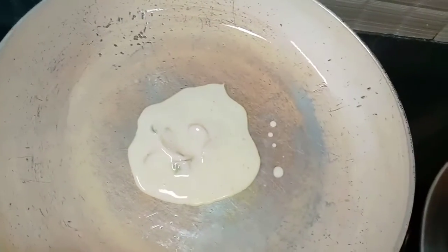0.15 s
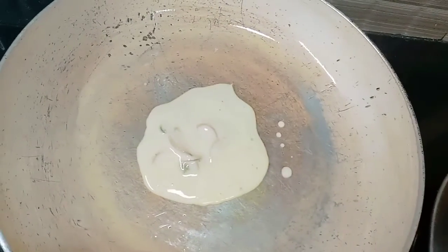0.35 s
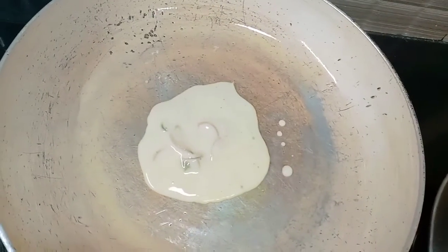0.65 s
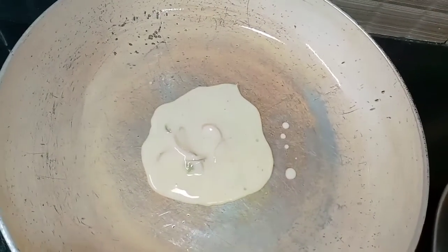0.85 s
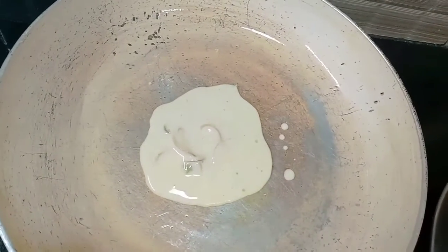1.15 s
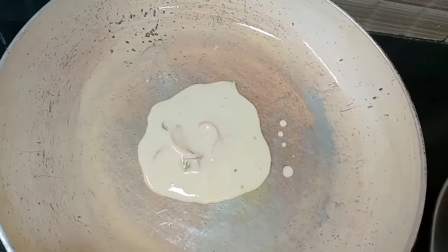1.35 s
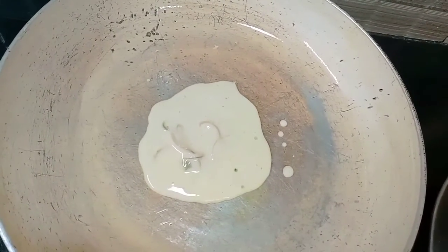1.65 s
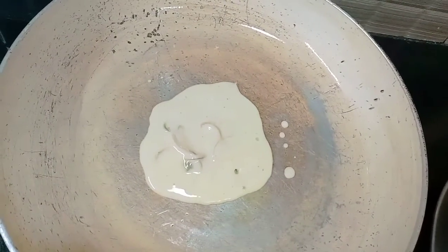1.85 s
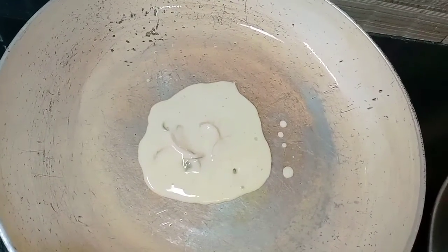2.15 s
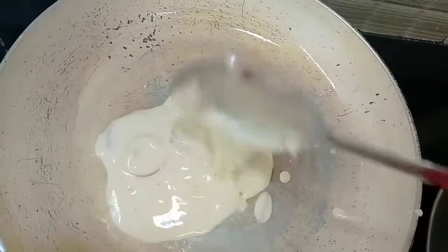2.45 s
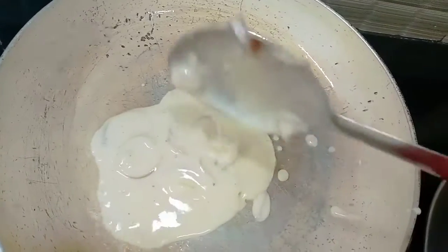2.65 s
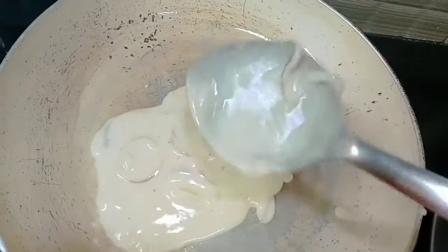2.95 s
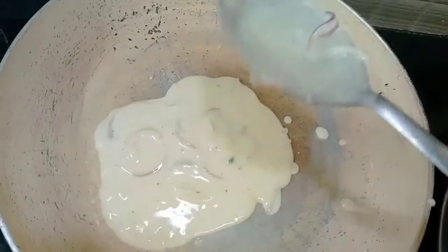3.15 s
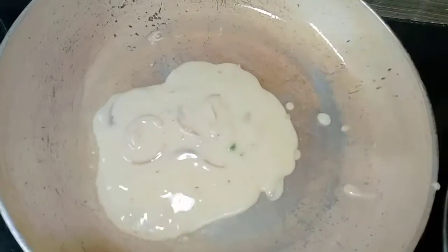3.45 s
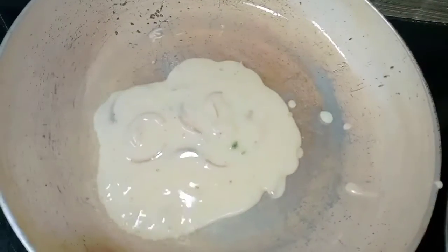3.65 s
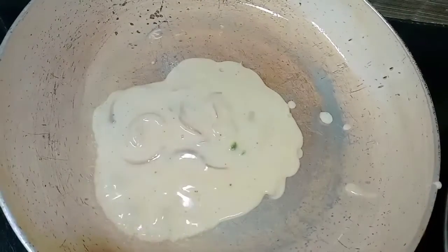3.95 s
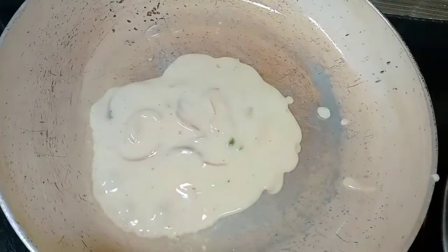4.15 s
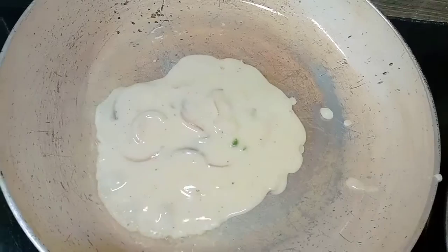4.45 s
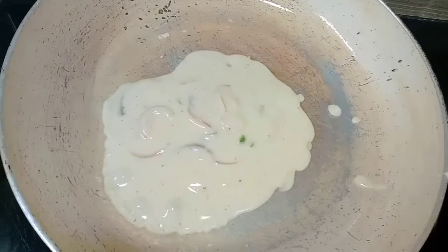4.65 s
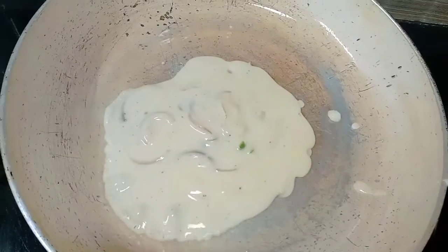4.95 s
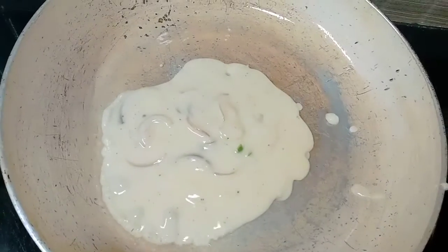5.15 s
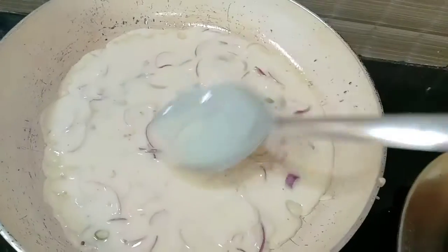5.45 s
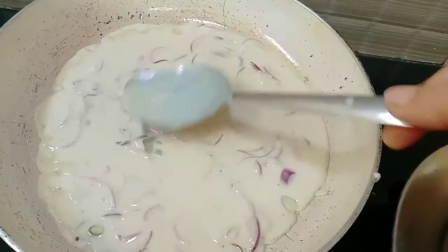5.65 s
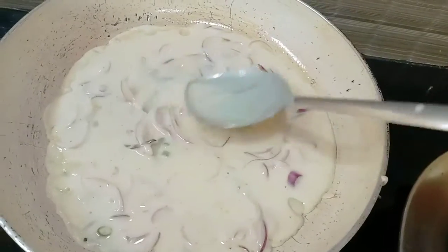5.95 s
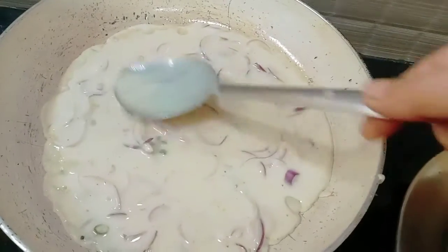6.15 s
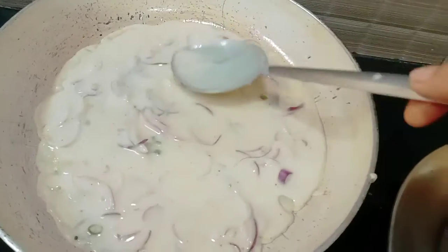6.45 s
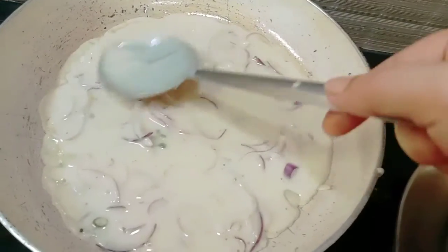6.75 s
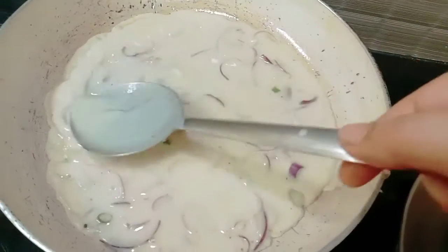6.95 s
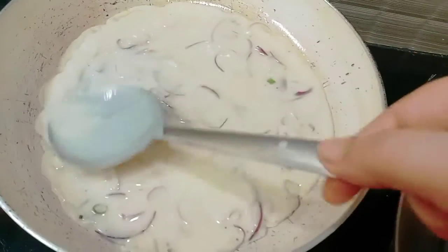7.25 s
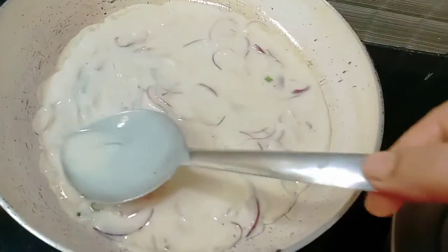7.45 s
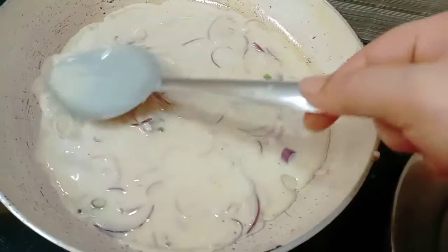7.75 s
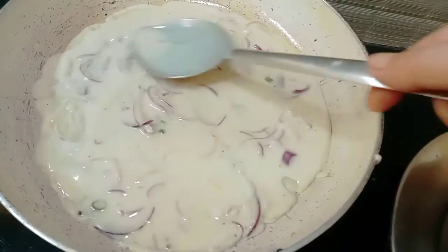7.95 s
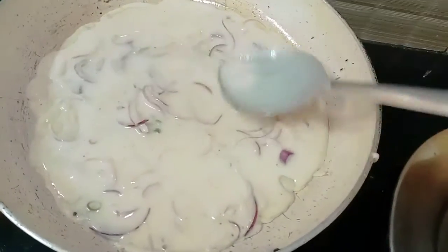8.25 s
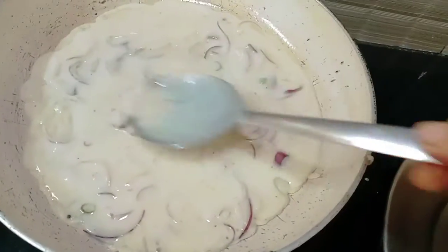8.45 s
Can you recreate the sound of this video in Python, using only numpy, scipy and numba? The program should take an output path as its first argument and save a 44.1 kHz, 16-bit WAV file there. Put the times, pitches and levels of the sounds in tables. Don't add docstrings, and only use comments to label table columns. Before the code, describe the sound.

Phone-close mono sound of frying: a bright, thinning sizzle with sharp bubble pops and a quick metal rattle, then a sudden strong wet frying rush. It eases for about three seconds and drops out for an instant. Afterwards, sparse gentle bubbling and faint spitting rise in small bursts as batter is spread, with low kitchen hum behind.

```python
import sys
import numpy as np
from scipy import signal
from scipy.fft import rfft, irfft, next_fast_len
from scipy.io import wavfile
from scipy.ndimage import uniform_filter1d, map_coordinates
from numba import njit

SR = 44100
rng = np.random.default_rng(int(sys.argv[2]) if len(sys.argv) > 2 else 0)


def gain_from_db(level_db):
    decades = np.asarray(level_db, float) / 20
    return 10 ** decades


def store_wav(level_fs):
    pcm = np.round(np.clip(np.atleast_2d(level_fs), -1, 1) * 32767)
    wavfile.write(sys.argv[1], SR, pcm.T.astype(np.int16))


N = 379701
SIZE = next_fast_len(N)
T = np.arange(N) / SR
HZ = np.arange(SIZE // 2 + 1) * SR / SIZE

# frequency in Hz, level per Hz in dB.
AIR = [(25, 19.5), (70, 4.5), (140, 17), (500, -4), (950, -36), (1900, -11), (5000, -27), (15500, -46)]
AIR_DB, FULL_PAN_AIR_DB = -65, -1
# frequency in Hz, width in Hz, level in dB.
HUM = [
    (100.5, 15, -63),
    (201, 11.5, -71.5),
    (260, 14, -85),
    (300, 15.5, -68.5),
    (420, 18, -73.5),
    (737, 12, -76.5),
    (790.4, 13, -73.5),
    (1277, 41, -78),
]
# time in seconds, peak in dB.
BOUNCES = [(0.724, -36.5), (1.036, -18), (1.047, -31), (1.06, -26), (1.086, -35), (1.098, -21), (1.11, -34),
           (1.127, -26), (1.149, -28), (1.179, -32), (1.195, -39), (1.207, -38), (1.219, -40), (1.231, -41),
           (4.464, -38), (4.485, -40), (4.52, -33.5), (4.564, -43)]
# frequency in Hz, level in dB, time to fall by 120 dB in seconds.
SPOON_MODES = [(484, -16, 0.057), (652, -13, 0.06), (820, -17, 0.044), (885, -5, 0.036), (935, -0.5, 0.035),
               (1260, -7, 0.055), (1630, -10, 0.05), (1870, -18, 0.034), (2140, -20, .035),
               (2220, -4, 0.035), (2560, -11, 0.045), (3100, -12, 0.07), (3400, -14, 0.08),
               (1500, -9, 0.0097)]
# start
# in seconds, length in seconds, level in dB, pitch in Hz.
SWELLS = [(.064, .04, -59, 420), (.204, 0.053, -58, 420), (.293, .035, -61, 420), (.385, 0.088, -56.5, 420),
          (.575, 0.12, -56, 420), (.77, 0.042, -54, 190), (.828, 0.046, -58.5, 420),
          (0.945, 0.054, -61, 420), (1.585, 0.047, -61.5, 420), (1.983, 0.12, -57.5, 420),
          (2.596, .086, -52, 420), (3.047, .066, -56.5, 420), (3.301, 0.16, -52.5, 420),
          (3.9, .08, -61, 420), (4.12, 0.056, -57, 420), (4.331, 0.057, -60, 420), (4.96, .06, -59, 420),
          (5.22, 0.12, -57.5, 420), (5.438, .096, -57, 420), (6.131, 0.033, -60, 420),
          (6.767, .084, -53.5, 420), (6.902, .062, -58, 420), (7.267, .04, -57, 420),
          (8.353, 0.031, -56.5, 420), (8.549, 0.055, -59, 420), (.9, 0.11, -55.5, 1260),
          (1.549, .068, -57, 1260), (1.926, .072, -58, 1260), (2.172, .05, -59, 1260),
          (6.611, 0.086, -57.5, 1260), (6.767, .038, -60, 1260), (6.945, 0.04, -57, 1250),
          (6.994, .04, -61, 1260), (7.082, .06, -58, 1260), (7.269, .046, -58, 1260),
          (7.918, 0.06, -59, 1260), (8.125, 0.06, -59, 1290), (8.4, .035, -58, 1150),
          (8.51, .065, -61, 810), (8.259, .052, -59, 1260), (5.749, .08, -63, 785), (6.34, .06, -63, 785),
          (6.93, .17, -60.5, 785), (7.5, .2, -66, 785), (8.1, .14, -63.5, 785), (5.55, 1.6, -67, 299.6),
          (7.2, 1.5, -66, 300)]
# start in
# seconds, end in seconds, pitch in Hz, width in Hz, level in dB.
VENTS = [(.5, 2.6, 5350, 300, -68), (2.25, 2.76, 1284, 200, -38), (5.5, 6.2, 1770, 730, -59.5),
         (5.63, 5.85, 3600, 350, -64), (5.8, 6.25, 3500, 300, -63), (5.6, 5.9, 1500, 400, -60),
         (4.54, 4.64, 2600, 1600, -45), (7.9, 8.4, 3800, 2200, -49), (7.8, 8.45, 2200, 800, -53),
         (7.165, 7.21, 8600, 3000, -60), (7.24, 7.32, 9000, 2000, -58), (6.71, 6.78, 9000, 4000, -56),
         (6.87, 6.94, 8000, 2200, -55), (8.12, 8.2, 9500, 3000, -54), (4.45, 4.51, 1500, 900, -52),
         (5.1, 5.4, 1450, 250, -50.5), (6.85, 7.3, 3700, 350, -58.5), (6.75, 7.04, 2870, 270, -59.5),
         (5.63, 5.8, 5130, 900, -63), (6.52, 6.8, 2930, 460, -52.5), (6.505, 6.84, 3900, 800, -51.5),
         (6.52, 6.8, 10000, 1000, -57), (6.55, 7, 7320, 800, -58), (6.6, 7.8, 1840, 250, -65),
         (6.7, 4.8, 8970, 1300, -70), (7.05, 7.4, 5030, 2170, -60), (7.24, 6.6, 1400, 900, -58),
         (7.5, 8.2, 4400, 2400, -61), (7.78, 8.3, 4400, 2000, -51), (7.82, 8.3, 7200, 1000, -51.5),
         (7.98, 8.5, 2900, 1800, -51), (8.1, 8.7, 9100, 1100, -51.5), (6.85, 7.45, 4300, 2600, -55),
         (5.38, 12, 200, 150, -64.5), (5.38, 16, 300, 20, -69), (2.24, 3.6, 14900, 900, -43),
         (2.24, 3.4, 12000, 1800, -42), (5.85, 6.45, 2500, 1200, -65.5), (7.9, 8.1, 10300, 1500, -52),
         (8.2, 10.4, 4013, 1400, -55.5)]
# middle in seconds, length in ms, level
# in dB, # pitch in Hz.
SPITS = [(.281, 10, -41, 7000), (.559, 8, -42, 7500), (.655, 8, -44, 7000), (.735, 16, -42, 4000),
         (1.051, 20, -47, 2900), (1.105, 16, -51, 3100), (1.217, 9, -42, 8000), (1.24, 8, -45, 7000),
         (1.345, 14, -46, 5500), (1.366, 20, -44, 7300), (1.417, 12, -51, 4000), (1.492, 20, -46, 7300),
         (1.633, 24, -50, 5000), (1.655, 14, -47, 8500), (1.721, 24, -48, 7000), (1.87, 22, -44, 6500),
         (1.884, 22, -45, 11000), (2.083, 10, -50, 7000), (2.157, 12, -47, 5500), (3.382, 16, -34, 3800),
         (3.47, 12, -33, 5500), (3.529, 18, -33, 4000), (3.545, 20, -35, 7000), (3.741, 24, -33, 4000),
         (3.83, 12, -37, 3500), (3.929, 24, -35, 3500), (4.003, 26, -34, 3500), (4.208, 26, -40, 4000),
         (4.701, 20, -44, 4000), (5.081, 12, -40, 11000), (5.155, 20, -38, 7000), (5.28, 10, -39, 8000),
         (5.308, 9, -42, 7000), (5.397, 6, -75, 13000), (5.563, 3, -64, 13000), (5.586, 12, -62, 7700),
         (5.86, 24, -65, 6500), (5.941, 12, -66, 6500), (6.068, 16, -59, 7000), (6.086, 10, -66, 11000),
         (6.244, 8, -72, 7000), (6.842, 14, -56, 7500), (6.893, 10, -51, 8000), (7.067, 26, -54, 6500),
         (7.17, 16, -53, 10000), (7.515, 14, -56, 6500), (7.7, 14, -55, 6000), (7.935, 20, -43, 10500),
         (8.141, 24, -45, 10000), (8.377, 10, -47, 7000), (4.52, 30, -49, 1000), (7.347, 14, -55, 1700),
         (5.513, 16, -56, 1500), (2.6, 14, -36, 2000), (2.44, 24, -36, 1000)]
# time in seconds, peak in dB, pitch in Hz.
POPS = [(0.1177, -22, 7670), (0.555, -29, 7570), (0.729, -17, 7400), (0.7651, -20, 7580),
        (0.9002, -23, 7300), (1.2149, -27, 6950), (1.5814, -15.5, 8160), (3.417, -28, 6640),
        (3.521, -24, 3970), (3.9982, -24, 3720), (4.2897, -30, 5740), (4.572, -24, 2300),
        (5.1467, -18, 7170), (5.254, -22, 4610), (5.507, -36, 1300), (5.6369, -42, 1500),
        (5.6438, -43, 3660), (5.7346, -40, 3710), (5.9376, -47, 3500), (5.9635, -45, 3600),
        (5.9815, -45, 3660), (5.766, -35, 2100), (5.766, -34, 3600), (5.8534, -41, 1890),
        (6.019, -31, 3460), (6.0632, -42, 1860), (6.396, -29.5, 2500), (6.7396, -32, 2800),
        (6.8904, -36, 2830), (6.9037, -35, 4000), (6.954, -37, 1253), (7.0216, -33, 3010),
        (7.069, -40, 1200), (7.165, -33, 3200), (7.1655, -31, 8390), (7.2521, -40, 7500),
        (7.343, -34, 1300), (7.511, -46, 1950), (7.6961, -39, 9350), (7.7605, -38, 4500),
        (7.8034, -32, 4270), (7.8445, -27, 7100), (7.8665, -20, 4300), (7.902, -26.5, 3700),
        (7.9201, -26, 7040), (8.047, -33, 3830), (8.1351, -29, 8990), (8.157, -27, 6990),
        (8.2709, -28, 6970), (8.4871, -32, 6600), (8.557, -32, 3500)]
POP_DB = 1.5
# pitch in Hz, octaves spanned.
SIZES = [
    (450, 2.3),
    (1600, 1.3),
    (3900, 1.3),
    (9000, 1.1),
]
# start in seconds, length in seconds, fizz in dB, cooling in dB per second, wetness.
SURGES = [(-.05, 2.287, -37, 4, 0.35), (-.05, 0.51, -37.5, 11.5, 0.73), (0.694, 0.053, -41.5, 26, 1.2),
          (2.241, 3.146, -31.5, 1.94, 1.02), (2.658, 1.58, -39, 0, 1.41), (2.265, 0.39, -55, 13, 3.2),
          (3.815, 0.23, -54, 3, 1.3), (4.453, 0.06, -49.5, 28.5, 1.96), (4.558, 0.051, -41, 25, 1.3),
          (5.35, 0.777, -73.5, -4, 2.7), (6.106, 0.46, -73.5, -3, 2.06), (6.32, 0.105, -62.5, 11, 2.53),
          (6.5, 0.91, -54.5, 8, 1.63), (7.403, 0.13, -65.5, -1, 1.9), (6.53, 0.09, -50, 14, 0.23),
          (7.235, 0.16, -61, 28, 2.4), (7.49, 0.28, -61, -10, 1.52), (7.735, 0.147, -54, -57, 0.89),
          (7.888, .9, -45, 2.5, 0.66), (7.903, 0.03, -40, 20, .8)]
RISE_S, FALL_S, DRYING_PER_S = 0.018, 0.013, 0.32
DRY_DB = [-36, -16, -6, 0.5]
WET_DB = [16, 9, 6, -0.5]
# time in seconds, level in dB.
SIMMER_DB = [
    (0, -62),
    (2.3, -61),
    (5.3, -68),
    (5.4, -56),
    (6.3, -62),
    (6.8, -60),
]
SPOTS = 6
CROWDED_FLARE, SPARSE_FLARE = .55, .9
# frequency in Hz, width in Hz, lift in dB.
PAN = [(419, 30, 4), (550, 230, -4.5), (950, 160, -0.5), (1258, 75, 10), (1500, 150, 5.5), (2100, 160, 4.5),
       (2930, 98, -3.5), (1930, 180, -3.5), (2390, 89, -6), (4770, 140, -3.5), (5580, 170, 1.5)]
# start in seconds, end in seconds, frequency in Hz,
# width in Hz, share removed 0-1.
SHADES = [(0, 1.0, 640, 300, 0.65), (1.25, 2.24, 800, 500, 0.5), (.45, 2, 6300, 400, 0.5),
          (3.0, 5.34, 557, 200, .25), (5.4, 6, 950, 300, .5), (6.5, 7, 2230, 500, 0.7),
          (6.7, 7.3, 4450, 400, 0.3), (6.95, 7.3, 3300, 200, 0.5), (7.45, 8.4, 1604, 400, 0.55),
          (7.4, 7.6, 6350, 400, .5), (8.31, 8.39, 1100, 900, .6), (8.5, 8.61, 1400, 900, .5),
          (8.15, 8.35, 550, 200, .5), (6.1, 6.33, 4500, 2500, .1), (4.63, 4.9, 2600, 900, .4),
          (6.78, 7.14, 10500, 3000, .3), (7.19, 7.24, 9000, 4000, .4), (5.75, 6.05, 1270, 120, .5),
          (2.2, 2.45, 4300, 1200, .3), (2.2, 2.45, 3000, 900, .25), (2.2, 2.45, 8700, 2500, .2),
          (2.9, 3.2, 2300, 600, .25), (3.35, 3.7, 8700, 2500, .2), (3.15, 3.45, 1000, 300, .3),
          (6.28, 6.45, 480, 150, .6), (4.45, 4.7, 470, 150, .6)]
# time in seconds, lag in ms, share.
HAND = [
    (4.6, .85, 0),
    (4.85, .55, .4),
    (5.0, .345, .62),
    (5.14, .24, .72),
    (5.34, .205, .75),
    (5.36, .205, 0),
]
# frequency in Hz, width in Hz, lift in dB.
PHONE = [(4400, 110, -3.5), (6294, 310, -6.5), (7200, 2180, 3), (8100, 230, -8.5), (12480, 1750, -5.5),
         (13800, 900, -5.5), (14500, 1200, 2.5), (15400, 650, 7)]
PHONE_LOW_HZ, PHONE_TOP_HZ = 80, 15470
# time in seconds, level in dB.
GAP = [
    (5.336, 0),
    (5.3366, -20),
    (5.35, -90),
    (5.366, -90),
    (5.371, -6),
    (5.378, 0),
]
LADLE_S, GAP_S = SURGES[3][0], GAP[0][0]


def unit(x):
    return x / np.sqrt(np.mean(x ** 2))


def walk(rate):
    hold = max(int(SR / rate), 2)
    steps = np.repeat(rng.standard_normal(N // hold + 1), hold)
    return 1.2 * uniform_filter1d(steps, hold)[:N]


def hiss(hz, width):
    resonance = 1 / (1 + (1.3 * (HZ - hz) / width) ** 2) ** 2
    return unit(irfft(rfft(rng.standard_normal(SIZE)) * resonance, SIZE)[:N])


def colour(x, modes):
    db = sum(lift / (1 + (2 * (HZ - hz) / width) ** 2) for hz, width, lift in modes)
    cepstrum = irfft(db * np.log(10) / 20, SIZE)
    cepstrum[1:SIZE // 2] *= 2
    cepstrum[SIZE // 2:] = 0
    return irfft(rfft(x, SIZE) * np.exp(rfft(cepstrum)), SIZE)[..., :N]


@njit
def ring(start, hz, tau, size):
    out = np.zeros(N + 1)
    for k in range(len(start)):
        turn = np.exp(2j * np.pi * hz[k] / SR - 1 / tau[k])
        rise_decay = np.exp(-4 / tau[k])
        net = 1 / (1 - turn) - 1 / (1 - turn * rise_decay)
        z = size[k] * np.conj(net) / abs(net)
        rise = 1.
        for i in range(start[k], min(N, start[k] + int(6 * tau[k]) + 2)):
            out[i] += z.imag * (1 - rise)
            z, rise = z * turn, rise * rise_decay
    return out[:N]


def room(x, t60=0.26, wet_db=-6, rim_db=-5):
    t = T[:SR // 2]
    tail = rng.standard_normal(len(t)) * np.exp(-np.log(1000) * t / t60) * np.minimum(t / 0.0072, 1)
    path = gain_from_db(wet_db) * tail / np.linalg.norm(tail)
    path[0] = 1
    path[rng.integers(6, 110, size=6)] = gain_from_db(rim_db) * np.array([1, -1, .8, -.8, .6, -.6])
    path = path / np.linalg.norm(path)
    cut = int(GAP[2][0] * SR)
    return np.concatenate([signal.oaconvolve(part, path)[:len(part)] for part in (x[:cut], x[cut:])])


def kitchen():
    hz, db = np.transpose(AIR)
    slope = gain_from_db(np.interp(np.log(HZ + 1), np.log(hz), db))
    air = irfft(rfft(rng.standard_normal(SIZE)) * slope, SIZE)[:N]
    hum = sum(gain_from_db(db) * hiss(hz, width) for hz, width, db in HUM)
    air_db = AIR_DB + FULL_PAN_AIR_DB * (T > GAP_S) + 1.3 * walk(2.25)
    return unit(air) * gain_from_db(air_db) + hum


def spoon():
    s, db = np.repeat(np.transpose(BOUNCES), len(SPOON_MODES), axis=1)
    hz, mode_db, t60 = np.tile(np.transpose(SPOON_MODES), len(BOUNCES))
    detune, uneven = rng.standard_normal((len(s), 2)).T
    tau = t60 * SR / np.log(1000) / 2
    size = gain_from_db(db + mode_db + 1.3 * uneven - 1.0)
    return ring((s * SR).astype(np.int64), hz * (1 + 0.008 * detune), tau, size)


def swells(edge_s=.018, waver=0.012):
    out, drift = np.zeros(N), 1 + waver * walk(25)
    for (s, length, db, hz), turn in zip(SWELLS, rng.random(len(SWELLS))):
        on = (T > s - edge_s) & (T < s + length + edge_s)
        inside = np.minimum(T[on] - s, s + length - T[on])
        shape = np.sin(np.pi / 2 * np.clip(inside / (2 * edge_s) + .5, 0, 1)) ** 2
        out[on] += gain_from_db(db + 3) * shape * np.sin(2 * np.pi * (np.cumsum(hz * drift[on]) / SR + turn))
    return out


def vents(edge_s=0.033):
    out = np.zeros(N)
    for a, b, hz, width, db in VENTS:
        splutter = gain_from_db(db + 1.1 * walk(22) + 2.4 * walk(170) - .8)
        opening = np.interp(T, [a, a + edge_s, b], [0, 1, 0]) ** .5
        out += splutter * opening * hiss(hz, width)
    return out


def spits(spread=.28, grain_db=5):
    out, half = np.zeros(N), 2048
    t = np.arange(-half, half) / SR
    draws = rng.standard_normal((len(SPITS), 2, 2 * half))
    for (s, ms, db, hz), (noise, grain) in zip(SPITS, draws):
        edges = [hz * (1 - spread), min(hz * (1 + spread), 16000)]
        band = signal.butter(2, edges, "band", fs=SR, output="sos")
        crackle = unit(signal.sosfilt(band, noise * gain_from_db(grain_db * grain)))
        middle = int(s * SR)
        out[middle - half:middle + half] += gain_from_db(db) * crackle * np.exp(-(2000 * t / ms) ** 2)
    return out


def pops(burst_ms=.04, turns=1.1):
    out = 0
    for (s, db, centre), (late, off) in zip(POPS, rng.standard_normal((len(POPS), 2, 12))):
        hz = np.minimum(centre * 2 ** (np.linspace(-.2, 1.6, 12) + .1 * off), 15000)
        start = ((s + burst_ms / 1000 * late ** 2) * SR).astype(np.int64)
        size = np.minimum(hz / centre, (centre / hz) ** 0.76)
        pop = ring(start, hz, turns * SR / hz, size)
        out = out + gain_from_db(db + POP_DB) * pop / np.abs(pop).max()
    return out


def boil():
    power = np.full((4, N), 1e-12)
    power[0] += gain_from_db(np.interp(T, *np.transpose(SIMMER_DB))) ** 2
    dropped_s = GAP[1][0]
    for start, length, db, cooling, wet in SURGES:
        on = (T > start) & (T < start + length + FALL_S) & ((T < dropped_s) | (start > dropped_s))
        age = T[on] - start
        gate = np.clip(np.minimum(age / RISE_S, 1 + (length - age) / FALL_S), 0, 1)
        wetness = np.maximum(wet - DRYING_PER_S * age, 0)
        size_db = db - cooling * age + np.c_[DRY_DB] + np.c_[WET_DB] * wetness
        power[:, on] += (gate * gain_from_db(size_db)) ** 2
    return 10 * np.log10(power)


def bubbles(per_s=30000, turns=1.1, scatter_db=2.85, low_hz=150, top_hz=16500):
    when, pick, life, odd, where = rng.random((int(per_s * N / SR), 5)).T
    start, spot = (when * N).astype(np.int64), (where * SPOTS).astype(int)
    span = np.sqrt(top_hz) - np.sqrt(low_hz)
    hz = (np.sqrt(low_hz) + pick * span) ** 2
    tau = np.maximum(turns * (.4 + 1.2 * life) * SR / hz, 1.5)
    per_octave = per_s * np.sqrt(hz) / (2 * span) * np.log(2)

    centre, octaves = np.transpose(SIZES)
    calm = np.where((T > LADLE_S) & (T < GAP_S), CROWDED_FLARE, SPARSE_FLARE)
    flare = 0.23 * walk(12) + 0.46 * walk(60) + 2.0 * walk(400)
    class_db = [(c + calm * (flare + 0.5 * walk(20) + 0.2 * walk(220)))[start] for c in boil()]
    class_db = class_db - 10 * np.log10(octaves)[:, None]
    place = np.interp(np.log(hz), np.log(centre), np.arange(4))
    db = map_coordinates(class_db, [place, np.arange(len(hz))], order=1)
    db -= 2.0 * np.maximum(np.log2(hz / centre[-1]), 0)
    db -= 8.5 * np.maximum(np.log2(centre[0] / hz), 0)

    turns_db = np.where(T > GAP_S, 10, 2) * np.array([walk(3) for _ in range(SPOTS)])
    share = gain_from_db(turns_db) / np.sqrt(np.mean(gain_from_db(turns_db) ** 2, axis=0))
    size = unit(gain_from_db(np.minimum(-scatter_db * np.log(1 - odd), 17.5)))
    size *= share[spot, start] * gain_from_db(db) * np.sqrt(SR / per_octave / (tau / 9))
    out = np.zeros(N)
    for k in range(SPOTS):
        here = spot == k
        out += room(ring(start[here], hz[here], tau[here], size[here]), 0.12, 0.98, -5.5)
    return gain_from_db(-1.85) * out


def shade(x, edge_s=.04):
    for a, b, hz, width, share in SHADES:
        band = signal.lfilter(*signal.iirpeak(hz, hz / width, fs=SR), x)
        covered = np.clip(np.minimum(T - a, b - T) / edge_s + .5, 0, 1)
        x = x - np.clip(share, 0, 1) * covered * band
    return x


def hand_echo(x, low_hz=2000, top_hz=6500):
    s, lag_ms, share = np.transpose(HAND)
    soft = signal.sosfilt(signal.butter(2, [low_hz, top_hz], "band", fs=SR, output="sos"), x)
    echo = np.interp(T - np.interp(T, s, lag_ms) / 1000, T, soft)
    return x + np.interp(T, s, share) * echo


def scene():
    sizzle = bubbles() + room(pops(), .12, -4.5, -9)
    pan = colour(sizzle, PAN) + room(vents(), .1, 1, -16)
    pan = hand_echo(shade(pan))
    rest = swells() + room(spoon(), 0.23, -4.5, -21.5) + kitchen()
    return np.tile(pan + rest + spits(), (2, 1))


def top_cut(x):
    return signal.sosfilt(signal.butter(12, 16870, fs=SR, output="sos"), x)


def record(dry):
    s, db = np.transpose(GAP)
    low = signal.butter(2, PHONE_LOW_HZ, "high", fs=SR, output="sos")
    top = signal.ellip(12, .3, 70, PHONE_TOP_HZ, fs=SR, output="sos")
    heard = signal.sosfilt(np.vstack([low, top]), colour(dry, PHONE))
    return top_cut(heard * gain_from_db(np.interp(T, s, db)))


dry = scene()
out = record(dry)
store_wav(out)
```